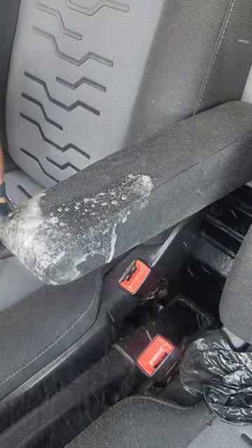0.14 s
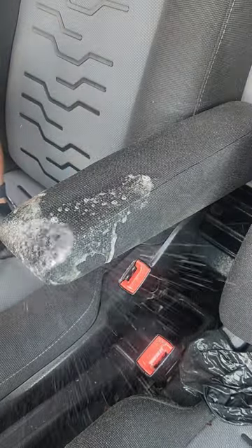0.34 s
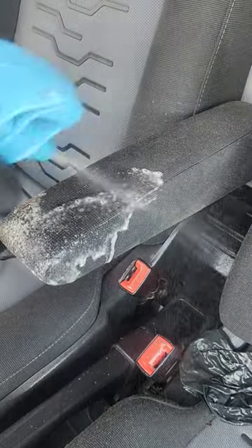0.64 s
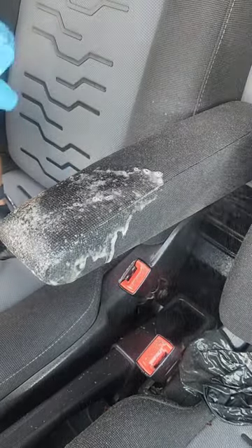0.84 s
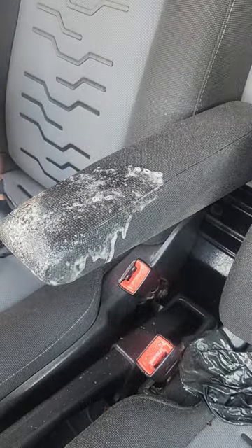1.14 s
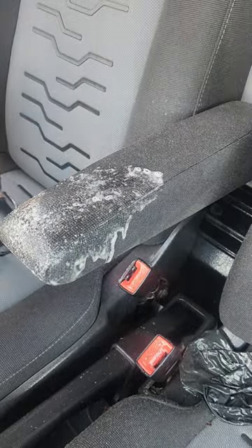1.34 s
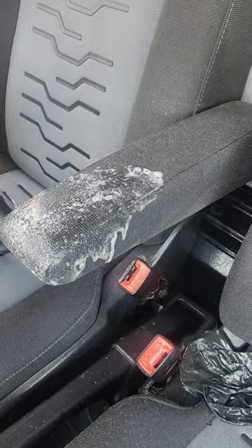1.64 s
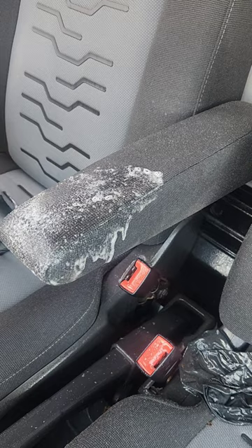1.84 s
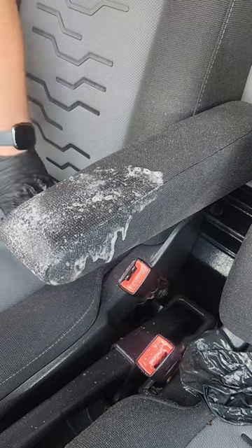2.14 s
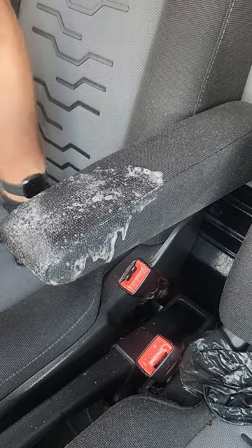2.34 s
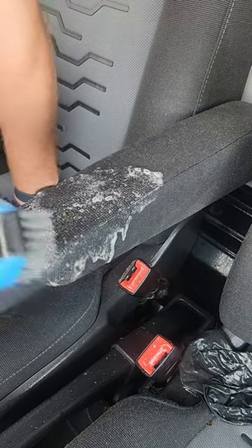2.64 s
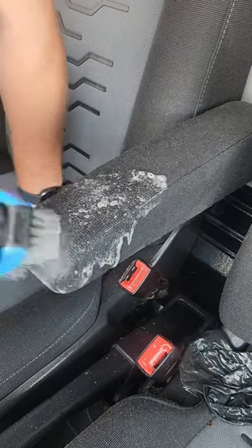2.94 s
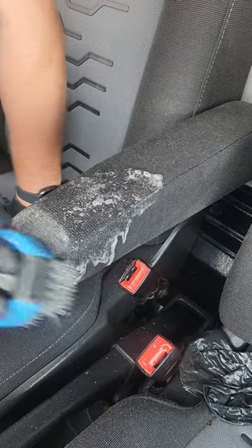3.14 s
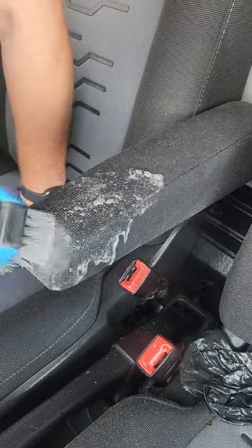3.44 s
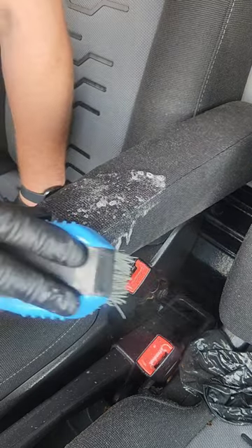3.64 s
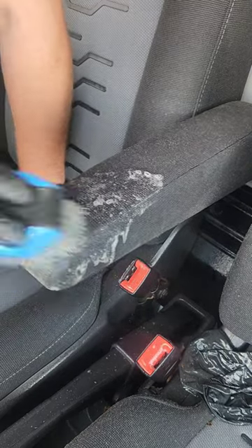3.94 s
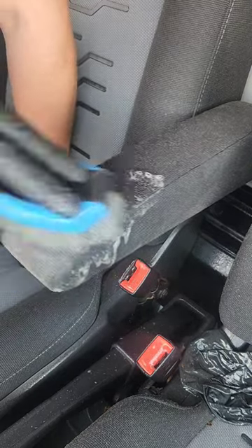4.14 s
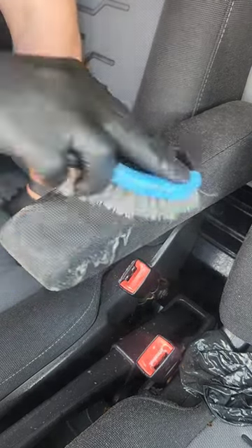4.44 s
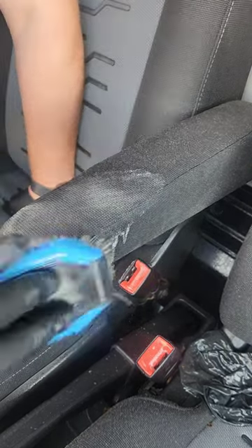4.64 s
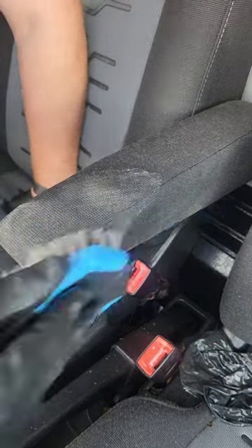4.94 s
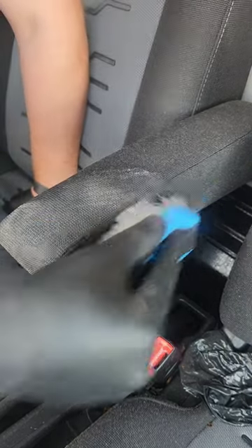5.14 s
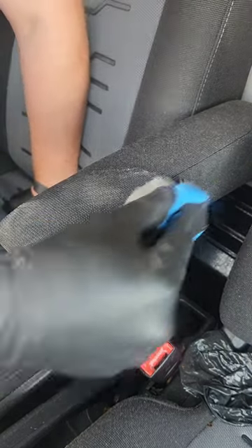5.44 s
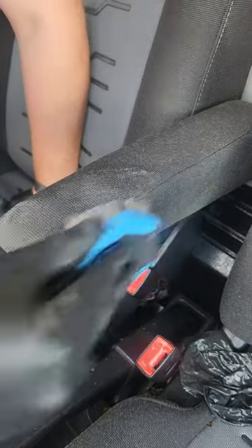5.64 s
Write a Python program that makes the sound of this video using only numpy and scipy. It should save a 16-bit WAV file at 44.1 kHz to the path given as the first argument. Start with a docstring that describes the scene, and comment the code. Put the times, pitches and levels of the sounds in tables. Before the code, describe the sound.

Rapid trigger-bottle squirts and plastic clacks, a bottle set down with a slosh, then a stiff brush scrubbing wet cloth back and forth in a car.

```python
"""Cleaning the cloth armrest of a car seat, close to a two-port microphone in the dead air of the cabin.
First a trigger bottle is pumped quickly: bursts of droplet clicks and ringing clacks, over a faint foam fizz.
It is put down with a clack, a slosh of bubbles and a thump of decaying seat modes; clothes slide, a knee settles.
Then a stiff brush scrubs the wet cloth to and fro, as noise and a zip shaped stroke by stroke, and the seat
rumbles under it as low noise. Still air lies beneath it all, and the cabin adds a short tail to most sounds."""
import sys
import numpy as np
from scipy import signal
from scipy.fft import rfft, irfft
from scipy.io import wavfile
from scipy.ndimage import uniform_filter1d

SR = 44100
rng = np.random.default_rng(int(sys.argv[2]) if len(sys.argv) > 2 else 0)


def transcribe(u):
    """Save the signal u as a 16-bit wav file named by the first command-line argument.

    u: samples, shape (n,) or (channels, n), limited to [-1, 1]; the rate is SR.
    q: integer samples, one column per channel.
    """
    v = np.clip(np.atleast_2d(u).T, -1, 1)
    q = np.round(v * 32767).astype(np.int16)
    wavfile.write(sys.argv[1], SR, q)


N = 255339
TIME, BINS = np.arange(N) / SR, np.fft.rfftfreq(N, 1 / SR)  # s, Hz

# Spectra only set the colour of a sound; its loudness comes from elsewhere.
# Still air of the cabin. Each row: frequency in Hz, relative density in dB per Hz.
AIR_SPECTRUM = [(40, -8.5), (70, 0), (160, -14), (300, -17), (650, -17), (1500, -19.5), (3100, -20),
                (7000, -25), (16000, -36)]
# Foam and sliding clothes. Each row: frequency in Hz, relative density in dB per Hz.
FIZZ_SPECTRUM = [(150, 3), (400, 0.5), (1400, -6.5), (2300, 0), (7000, -2.5), (16000, -4.5)]
# Rumble of the seat. Each row: frequency in Hz, relative density in dB per Hz.
SEAT_SPECTRUM = [(10, 3), (20, 1), (30, 3), (46, 3), (68, -10.5), (110, -22), (160, -34), (230, -26),
                 (300, -47.5), (660, -88)]
# Padded knock of a bump. Each row: frequency in Hz, relative density in dB per Hz.
KNOCK_SPECTRUM = [(100, -21), (200, 9), (330, 6), (480, 13.5), (750, 1), (1200, 3.5), (1700, -36),
                  (4000, -44)]
# Cloth scuffed by a bump. Each row: frequency in Hz, relative density in dB per Hz.
SCUFF_SPECTRUM = [(300, -5), (900, -9), (1600, -14), (2200, -5), (4000, -9.5), (7500, -21.5), (9500, -24),
                  (16000, -27)]
# Droplets from the nozzle. Each row: frequency in Hz, relative density in dB per Hz.
SPRAY_SPECTRUM = [(180, -47), (330, -22), (600, -0.5), (1500, 2.5), (4500, 0.5), (16000, 5.5)]
# Plastic trigger, without its rings. Each row: frequency in Hz, relative density in dB per Hz.
TRIGGER_SPECTRUM = [(120, -22), (320, -13.5), (650, -1.5), (1500, 0), (4500, -3.5), (16000, -13)]
# Bristles on wet cloth, without their rings. Each row: frequency in Hz, relative density in dB per Hz.
BRISTLE_SPECTRUM = [(100, -53), (170, -26), (230, -19), (300, -8.5), (480, -5.5), (640, 0.5), (800, -0.5),
                    (1100, 0.5), (1450, -1.5), (2400, -2.5), (7000, -5.5), (16000, -9.5)]

# Modes of the seat frame. Each row: frequency in Hz, relative level in dB, fall by 60 dB in seconds.
SEAT_MODES = [(30.5, -2.5, 0.23), (59, -2, 0.044), (94.7, 9.5, 0.058), (126.5, 1, 0.11), (237, -7.5, 0.085),
              (315, -19.5, 0.1)]
# Hard plastic scraping. Each row: frequency in Hz, width in Hz, relative level in dB.
HANDLE_MODES = [(1480, 76, -6), (1605, 56, 3), (1730, 45, -1.5), (2140, 74, -1), (2690, 56, -2)]
# Rings of the bottle shell. Each row: frequency in Hz, width in Hz, lift in dB.
BOTTLE_RINGS = [(1040, 110, 3.5), (2070, 350, 6), (2670, 300, 0), (3270, 220, 4), (3870, 310, 0),
                (4190, 430, 9), (4980, 240, 4.5), (7560, 200, 8.5)]
# Rings of the brush and nearby panels. Each row: frequency in Hz, width in Hz, lift in dB.
BRUSH_RINGS = [(680, 34, 7), (1130, 58, 3.5), (1290, 52, -1.5), (1340, 88, 3), (1558, 46, 6.5),
               (1940, 12.7, 12), (2250, 180, 5), (2678, 52, 6.5), (2940, 130, -3), (3030, 230, 4.5),
               (3680, 120, 1), (4450, 210, 4), (7470, 150, 3.5)]

# How alike the two ports hear a noise. Each row: frequency in Hz, left-right likeness from -1 to 1.
PORT_LIKENESS = [(60, .99), (130, 0.96), (290, 0.88), (640, 0.67), (1410, 0.13), (3100, -0.18),
                 (6800, 0.12), (16000, 0.0011)]
# Sources lie to the left. Each row: frequency in Hz, left over right in dB.
LEFT_LEAN = [(60, 1), (130, 2.5), (400, 3.7), (1300, 4.3), (2400, 4), (4400, 5), (8100, 9.5), (11000, 4.3),
             (15500, 6)]
# Colour of the microphone ports. Each row: frequency in Hz, gain in dB.
MICROPHONE_COLOUR = [(20, 0), (5000, 0), (6400, -2), (7600, 1.5), (8200, -1.5), (9400, -13), (10100, -12),
                     (11500, -5), (13000, -4), (15600, 0)]

# Event levels are relative: trims, place and the sound's own envelope come on top.
# Cloth slides over the seat. Each row: start in seconds, length in seconds, level in dB.
SWISHES = [(1.03, 0.17, -50), (1.37, 0.19, -53), (1.718, 0.033, -62), (1.835, 0.13, -48.5),
           (2.03, 0.049, -51), (2.105, 0.058, -47.5), (2.17, 0.12, -46), (2.445, 0.14, -49)]
# Weight is put on the seat and it lurches. Each row: start in seconds, length in seconds, level in dB.
LURCHES = [(1.42, 0.14, -36), (2.51, .08, -36), (3.435, 0.1, -28.5), (3.615, 0.084, -26), (4.145, .06, -19)]
# Soft bumps of bottle, knee and brush on the seat.
# Each row: start in seconds, knock level in dB, low boom level in dB, cloth scuff level in dB.
BUMPS = [(1.414, -32, -26.5, -36), (1.417, -30, -19, -31), (1.844, -42, -28.5, -44), (1.875, -64, -37, -66),
         (2.451, -45.5, -46, -54), (3.902, -54, -36.5, -41), (4.16, -47, -31.5, -70),
         (4.281, -58, -32.5, -58), (4.409, -42, -43, -62), (4.99, -41, -41, -60)]
# Plastic slides as it is handled. Each row: start in seconds, length in seconds, level in dB.
SCRAPES = [(1.068, 0.18, -63), (2.436, 0.062, -55.5), (2.498, 0.11, -57.5)]
# Liquid sloshes in the bottle as it is put down. Each row: start in seconds, level in dB, middle pitch in Hz.
GLUGS = [(1.305, -47, 610), (1.326, -45.5, 422), (1.355, -46, 517), (1.385, -47, 450), (1.451, -42, 484),
         (1.52, -42, 405), (1.546, -51, 614), (1.635, -49, 650), (1.684, -54, 326), (1.724, -46.5, 523),
         (1.73, -39.5, 342), (2.2, -43, 330)]
# Squirts from the nozzle.
# Each row: start in seconds, length in seconds, level of the jet in dB, level of the fine mist in dB.
SQUIRTS = [(0.032, 0.02, -47, -41.5), (0.07, 0.025, -38.5, -36.5), (0.109, 0.032, -48, -40),
           (.161, 0.031, -38, -41.5), (.217, .035, -59, -48), (.281, 0.035, -42, -46),
           (0.324, 0.03, -40, -39.5), (0.374, 0.035, -32.5, -37), (0.411, 0.034, -36, -42.5),
           (.441, .032, -38, -42), (0.489, 0.026, -38.5, -40.5), (0.587, 0.023, -37, -36.5),
           (0.61, 0.082, -45.5, -56), (0.696, 0.034, -33, -37), (.764, 0.039, -56, -49),
           (0.813, 0.043, -35, -41), (.846, 0.076, -49, -42)]
# Clacks of the trigger. Each row: start in seconds, level in dB, brightness in dB per octave.
CLACKS = [(.0065, -27.5, 1.5), (0.096, -35, -3), (0.099, -29, 0.5), (.203, -37.5, -3), (0.21, -27.5, 1),
          (0.269, -37.5, 7), (.305, -28, 1), (0.5249, -27.5, 1), (.589, -42, 16), (0.632, -34, 4),
          (0.651, -42.5, -2.5), (.747, -33.5, 0), (0.7549, -25.5, -1.5), (1.0323, -33, -4.5),
          (1.0353, -16.5, 5)]
# Brush strokes, push and pull in turn, each lasting until the next.
# Each row: start in seconds, level in dB, place of top speed within the stroke from 0 to 1.
STROKES = [(2.561, -57.5, 0.7), (2.622, -48.5, 0.36), (2.695, -44, 0.6), (2.749, -47, 0.7),
           (2.814, -43, 0.76), (2.875, -43.5, 0.53), (2.947, -38.5, 0.62), (3.003, -43.5, 0.76),
           (3.08, -40.5, 0.3), (3.148, -42.5, 0.71), (3.202, -43.5, 0.2), (3.263, -49, 0.51),
           (3.335, -43, 0.55), (3.409, -44.5, 0.32), (3.469, -41, 0.72), (3.528, -39.5, 0.59),
           (3.608, -36.5, 0.39), (3.673, -42.5, 0.35), (3.735, -38, 0.79), (3.799, -43.5, 0.53),
           (3.869, -36.5, 0.63), (3.93, -39.5, 0.48), (3.996, -37, 0.71), (4.069, -38.5, 0.48),
           (4.126, -39.5, 0.79), (4.188, -40, 0.31), (4.264, -36, 0.75), (4.32, -37.5, .54),
           (4.39, -37, 0.64), (4.46, -36.5, 0.38), (4.554, -46.5, 0.77), (4.609, -79, 0.22),
           (4.664, -38, .56), (4.751, -41, 0.47), (4.831, -34, 0.64), (4.903, -38, 0.38),
           (4.984, -35, 0.48), (5.045, -37, 0.49), (5.119, -35, 0.39), (5.189, -36.5, 0.49),
           (5.265, -35, 0.39), (5.334, -35.5, 0.44), (5.406, -33.5, 0.64), (5.47, -35.5, 0.5),
           (5.556, -32, 0.6), (5.62, -37, .51), (5.69, -33, 0.81), (5.748, -36.5, 0.59)]
# Bristles stick just after a turn, then spring loose.
# Each row: moment in seconds, jump in level in dB (negative: a drop).
CATCHES = [(2.966, 0), (3.092, 8.5), (3.218, 14.5), (3.887, -0.5), (4.197, -4), (4.282, 1), (4.674, 3),
           (4.768, 14), (5.004, 6), (5.142, 10), (5.279, 11.5), (5.422, 8), (5.627, 8)]
# Where the brush works along the armrest. Each row: time in seconds, place from 0 (padded tip) to 1 (middle).
PLACE = [(2.6, .35), (2.95, 0.56), (3.15, 0.053), (3.35, .05), (3.55, 0.52), (4.2, 0.69), (4.7, 0.9),
         (5.2, 0.94), (5.7, 0.93)]

# What the place does to the sound: (dB at the tip, dB at the middle).
THUD_DB = (4.5, -6)  # dull drumming of the armrest
BODY_DB = (3, -7.5)  # low mids of the padding
SCRATCH_DB = (0.5, 0)  # coarse scratch of the bristles
HISS_DB = (11.5, 1.5)  # fine hiss of the foam, which lies thickest on the tip
ZIP_DB = (-24.5, -7)  # zip of the taut weave
LEVER_DB = (12, 1.5)  # rocking of the seat

AIR_DB, IDLE_ROCK_DB = -55.5, -47  # still air; rocking of the seat while the hand rests
FOAM_DB, FOAM_FADE_DB_PER_S = -56, 1
HARD_BUMP_DB, DULLING = -22, 0.48  # boom with modes as listed; dB per octave over 100 Hz lost per dB softer
CLACK_T60_S, CLACK_DAMPING = 0.055, 0.29  # ring of a clack at -30 dB; a harder squeeze damps the shell more
STOP_S, CATCH_S = 5.808, 0.018  # end of the last stroke; fade of a catch on either side
TURN_DRAG = (0.089, 0.21)  # rubbing while the hand turns, on a pace of 0-1: (before a push, before a pull)


def amp(db):
    """Decibels to gain."""
    return 10 ** (np.asarray(db) / 20)


def read(points, hz):
    """A curve joined by straight lines on a log-frequency axis."""
    f, value = np.transpose(points)
    return np.interp(np.log(hz + 1), np.log(f + 1), value)


def evened(x):
    """Scales a pair of channels so that their middle has rms 1."""
    return x / np.sqrt(np.mean(x.mean(0) ** 2) + 1e-20)


def add(mix, s, sound):
    """Lays a sound into the mix at time s."""
    part = mix[..., max(round(s * SR), 0):][..., :sound.shape[-1]]
    part += sound[..., :part.shape[-1]]


def wander(rate_hz):
    """Smooth chance of rms 1, up to about the given rate."""
    x = irfft(rfft(rng.standard_normal(N)) / (1 + (BINS / rate_hz) ** 4), N)
    return x / x.std()


def grains(per_s, spread_db):
    """Tiny clicks of very unequal size, for two channels."""
    size = amp(spread_db * np.minimum(rng.exponential(1, (2, N)), 4))
    sign = rng.choice([-1, 1], (2, N))
    return size * sign * (rng.random((2, N)) < per_s / SR)


def coloured(db, drive=None):
    """Noise or clicks given a spectrum, as the two microphone ports hear them from the left; middle at rms 1."""
    a, b = rfft(rng.standard_normal((2, N)) if drive is None else drive)
    same = np.clip(read(PORT_LIKENESS, BINS), -1, 1)
    lean = amp(read(LEFT_LEAN, BINS) / 2)
    left = a * lean
    right = (same * a + np.sqrt(1 - same ** 2) * b) / lean
    return evened(irfft(np.array([left, right]) * amp(db + read(MICROPHONE_COLOUR, BINS)), N))


def split(x, edge_hz):
    """The parts of a sound below and above a soft edge."""
    low = irfft(rfft(x) / (1 + (BINS / edge_hz) ** 6), N)
    return low, x - low


def decay(t, t60):
    """Exponential fall by 60 dB in t60 seconds."""
    return np.exp(-np.log(1000) * t / t60)


def blow(s, rise, t60):
    """The envelope of a blow: quick rise, exponential fall."""
    t = np.maximum(TIME - s, 0)
    fall = np.exp(-np.minimum(np.log(1000) * t / t60, 30))
    return (1 - np.exp(-t / rise)) * fall


def swells(events):
    """One smooth arch of level for each event."""
    out = np.zeros(N)
    for s, length, db in events:
        add(out, s, amp(db) * np.sin(np.linspace(0, np.pi, int(length * SR))))
    return out


def humps(modes):
    """The level and the bell over frequency of each resonance."""
    return [(db, 1 / (1 + (2 * (BINS - hz) / width) ** 2)) for hz, width, db in modes]


def by_place(ends_db, bend=1):
    """A gain that moves between its two ends as the brush travels along the armrest."""
    place = np.maximum(np.interp(TIME, *np.transpose(PLACE)), 0)
    tip_db, middle_db = ends_db
    return amp(tip_db + (middle_db - tip_db) * place ** bend)


def still_air():
    """The air of the closed cabin is a steady, mostly low noise."""
    return amp(AIR_DB) * coloured(read(AIR_SPECTRUM, BINS))


def rustle(swish_db=0., flutter_db=2.0):
    """Foam fizzes ever more faintly, and clothes slide over the seat between spraying and scrubbing."""
    foam = amp(FOAM_DB - FOAM_FADE_DB_PER_S * TIME)
    level = np.hypot(foam, amp(swish_db) * swells(SWISHES))
    fizz = coloured(read(FIZZ_SPECTRUM, BINS), grains(per_s=6000, spread_db=3.5))
    return fizz * level * amp(flutter_db * wander(rate_hz=88))


def seat(friction, rumble_db=0.0):
    """The seat rocks with every stroke, most with the brush at the tip, and lurches under shifting weight."""
    rocking = coloured(read(SEAT_SPECTRUM, BINS))
    # level out the slow swells of the noise, so that the strokes shape it
    rocking /= np.sqrt(uniform_filter1d(rocking.mean(0) ** 2, size=4000) + .05)
    shove = uniform_filter1d(friction, size=2000) * by_place(LEVER_DB, bend=3.6)
    level = np.sqrt(amp(IDLE_ROCK_DB) ** 2 + shove ** 2 + swells(LURCHES) ** 2)
    return rocking * amp(rumble_db) * level


def bumps(boom_db=0., knock_db=7.5, scuff_db=2.0):
    """A padded blow booms in the seat frame, duller the softer it is; it knocks and scuffs the cloth."""
    knock = coloured(read(KNOCK_SPECTRUM, BINS))
    scuff = coloured(read(SCUFF_SPECTRUM, BINS))
    out = np.zeros((2, N))
    t = np.arange(SR // 2) / SR
    for s, mid_db, low_db, high_db in BUMPS:
        for k, (hz, db, t60) in enumerate(SEAT_MODES):
            dull_db = DULLING * (low_db - HARD_BUMP_DB) * max(np.log2(hz / 100), 0)
            ring = (1 - np.exp(-t / .003)) * decay(t, t60) * np.sin(2 * np.pi * hz * t)
            mode = (-1) ** k * ring  # neighbouring modes start in opposite directions
            add(out, s, amp(low_db + boom_db + db + dull_db) * mode * amp([[1.3], [-1.3]]))
        out += amp(mid_db + knock_db) * knock * blow(s, 0.01, 0.064)
        out += amp(high_db + scuff_db) * scuff * blow(s, 0.0039, 0.067)
    return out


def scrapes():
    """Friction makes hard plastic sing faintly at its resonances."""
    pressure = np.zeros(N)
    for s, length, db in SCRAPES:
        add(pressure, s, amp(db) * signal.windows.tukey(round(length * SR), .5))
    response = sum(amp(db) * bell for db, bell in humps(HANDLE_MODES))
    return pressure * coloured(20 * np.log10(response))


def slosh(slosh_db=0.5, t60=0.024, spread=0.27, scatter_s=0.0124, count=6):
    """Each glug is a handful of bubbles that ring briefly and rise in pitch."""
    out, t = np.zeros(N), np.arange(SR // 8) / SR
    envelope = (1 - np.exp(-t / 0.00055)) * decay(t, t60)
    for s, db, hz in GLUGS:
        sizes = np.linspace(-1, 1, count) + rng.normal(0, 0.34, count)
        for size, delay in zip(sizes, rng.random(count)):
            pitch_hz = hz * np.exp(spread * size)
            bubble = np.sin(2 * np.pi * pitch_hz * t * (1 + t))
            add(out, s + scatter_s * delay, amp(db + slosh_db) * bubble * envelope)
    return out * amp([[1.8], [-1.8]])


def sprayer(jet_db=0., mist_db=0., clack_db=1.5, snap=0.47):
    """Each pump squirts a burst of droplets; the trigger clacks at the ends of its travel."""
    droplets = coloured(read(SPRAY_SPECTRUM, BINS), grains(per_s=20000, spread_db=3.5))
    jet, mist = split(droplets, edge_hz=5100)
    jet_flow = swells([(s, length, db + jet_db) for s, length, db, _ in SQUIRTS])
    mist_flow = swells([(s, length, db + mist_db) for s, length, _, db in SQUIRTS])
    out = jet * jet_flow + mist * mist_flow
    shell = read(TRIGGER_SPECTRUM, BINS) + sum(db * bell for db, bell in humps(BOTTLE_RINGS))
    octaves = np.log2(np.maximum(BINS, 500) / 3000)  # brightness pivots at 3 kHz
    for s, db, tilt in CLACKS:
        t60 = CLACK_T60_S / amp(CLACK_DAMPING * (db + 30))
        # a hard snap, then the shell dies away
        strike = blow(s, 0.00088, t60) + snap * blow(s, .0001, 0.0033)
        out += amp(db + clack_db) * coloured(shell + tilt * octaves) * strike
    return out


def hand(grip=1.23):
    """Speed and friction of the brush: greatest in mid-stroke, nearly still where the hand turns."""
    speed, friction = np.zeros((2, N))
    ends = [row[0] for row in STROKES[1:]] + [STOP_S]
    for k, ((s, db, crest), end) in enumerate(zip(STROKES, ends)):
        u = np.linspace(0, 1, round(end * SR) - round(s * SR))
        phase = np.interp(u, [0, np.clip(crest, .1, .9), 1], [0, .5, 1])
        pace = abs(np.sin(np.pi * phase))
        drag = np.interp(u, [0, 1], np.roll(TURN_DRAG, k))  # push and pull swap their ends
        force = drag + pace ** grip
        add(speed, s, pace)
        add(friction, s, amp(db) * force / np.sqrt(np.mean(force ** 2)))
    # for a positive jump: quiet just before the bristles let go and loud just after
    stick_db = np.zeros(N)
    for s, jump in CATCHES:
        fade = np.exp(-np.minimum(abs(TIME - s) / CATCH_S, 20))
        stick_db += jump / 2 * np.sign(TIME - s) * fade
    return speed, uniform_filter1d(friction, size=200) * amp(stick_db)


def weave(speed, top_hz=1200, spread=.09, count=7):
    """Tufts of bristles tick over the threads: a fuzzy zip whose pitch follows the speed of the hand."""
    out = np.zeros((2, N))
    for _ in range(count):
        pitch_hz = top_hz * speed ** 0.27 * (1 + spread * wander(rate_hz=83))
        turns = 2 * np.pi * np.cumsum(pitch_hz) / SR
        offset = np.array([[0], [rng.normal(1.0, 0.11)]])  # each tuft has its own phase gap between the ports
        out += np.sin(turns + offset) + 0.16 * np.sin(2 * (turns + offset))
    return evened(out * amp([[2], [-2]]))


def brush(speed, friction, rub_db=0.0, stutter_db=1.0, patchy_db=1.07):
    """Bristles flick over wet cloth: rasp, foam hiss and the zip of the weave, flickering as tufts take turns."""
    rings = sum(db * bell for db, bell in humps(BRUSH_RINGS))
    flicks = coloured(read(BRISTLE_SPECTRUM, BINS) + rings, grains(per_s=7000, spread_db=1.0))
    rasp, fine = split(flicks, edge_hz=9800)
    body, rasp = split(rasp, edge_hz=960)
    thud, body = split(body, edge_hz=350)
    scratch, rasp = split(rasp, edge_hz=1970)
    bands = [by_place(THUD_DB) * thud, by_place(BODY_DB) * body, by_place(SCRATCH_DB) * scratch,
             amp(rub_db) * rasp, by_place(HISS_DB) * fine]
    # each band flickers on its own
    rubbing = sum(band * amp(patchy_db * wander(rate_hz=21)) for band in bands)
    ticking = friction * by_place(ZIP_DB) * weave(speed)
    zips = irfft(rfft(ticking) * amp(rings), N)
    return (friction * rubbing + zips) * amp(stutter_db * wander(rate_hz=40.0))


def cabin(x, t60=.12, wet_db=-17):
    """Glass and trim throw back a short tail that the upholstery soon swallows."""
    t = np.arange(SR // 5) / SR
    echoes = rng.standard_normal((2, len(t))) * (rng.random((2, len(t))) < .08)
    taps = echoes * (t > .003) * decay(t, t60)
    taps /= np.linalg.norm(taps, axis=1, keepdims=True)
    return x + amp(wet_db) * signal.fftconvolve(x, taps, axes=1)[:, :N]


def scene():
    """All the work in the cabin, over still air; bumps, seat and air stay free of the tail."""
    speed, friction = hand()
    background = still_air() + seat(friction) + bumps()
    work = rustle() + scrapes() + slosh() + sprayer() + brush(speed, friction)
    return background + cabin(work)


def record(dry, edge_hz=15950):
    """The band limit of the recorder: a steep low-pass."""
    lowpass = signal.firwin(511, edge_hz, window=("kaiser", 9), fs=SR)
    return signal.oaconvolve(dry, lowpass[None], "same")


dry = scene()
out = record(dry)
transcribe(out)
```